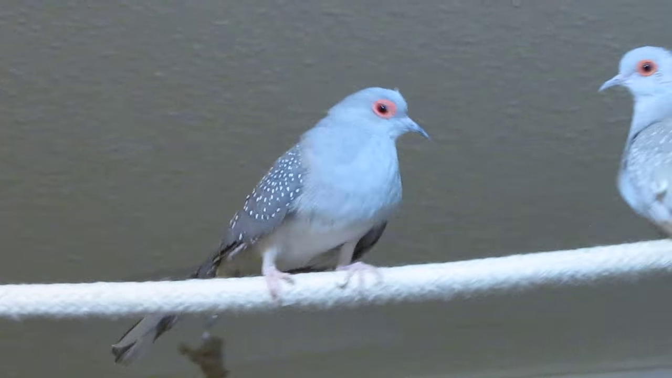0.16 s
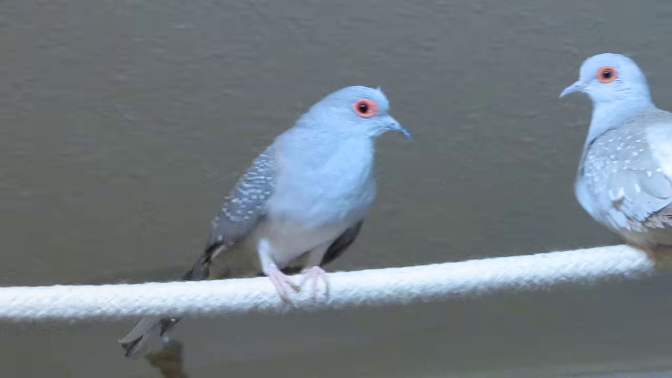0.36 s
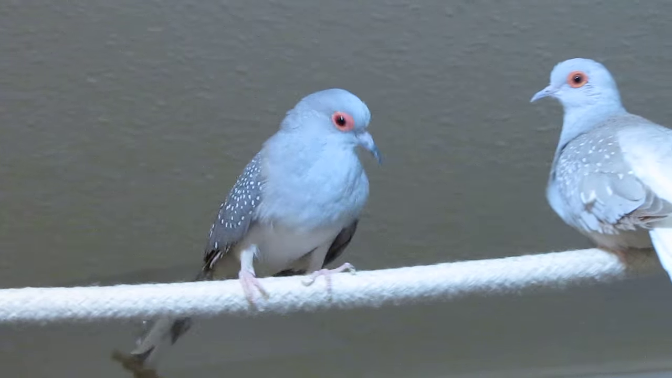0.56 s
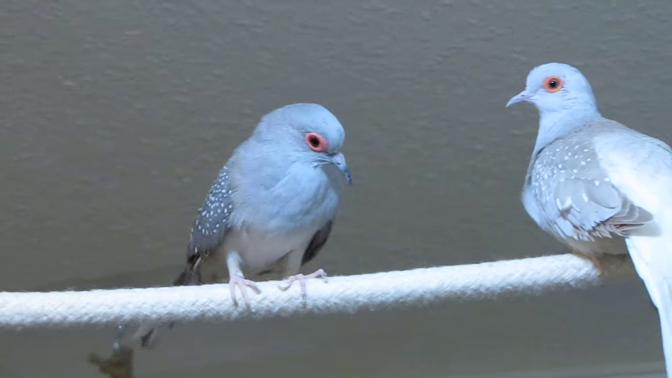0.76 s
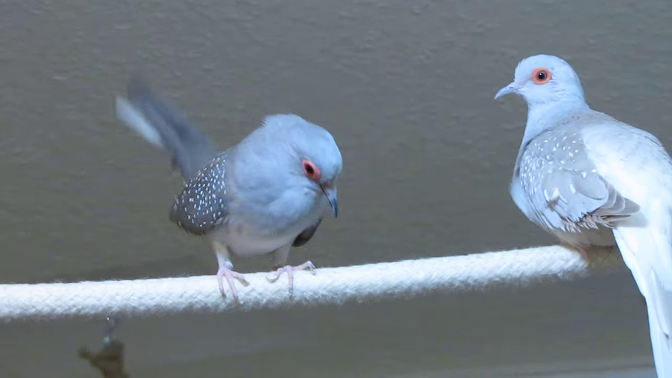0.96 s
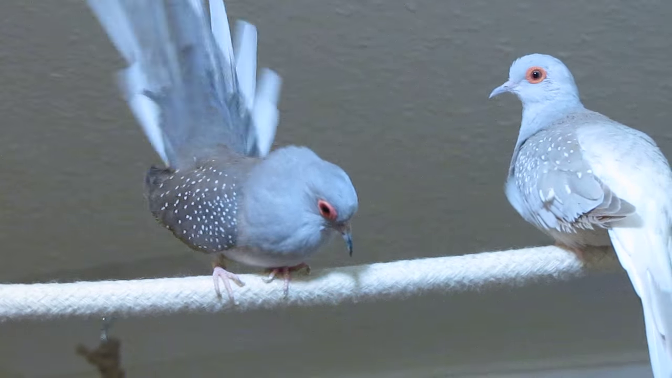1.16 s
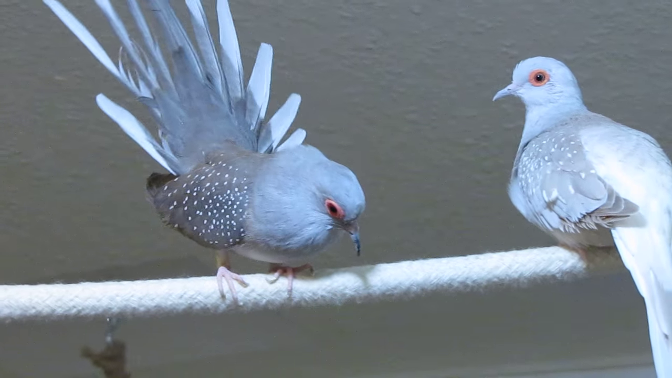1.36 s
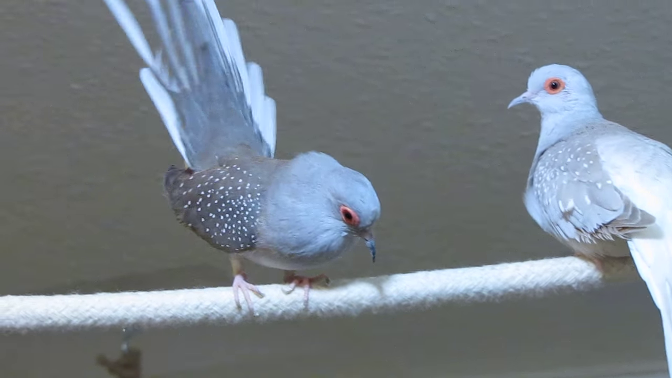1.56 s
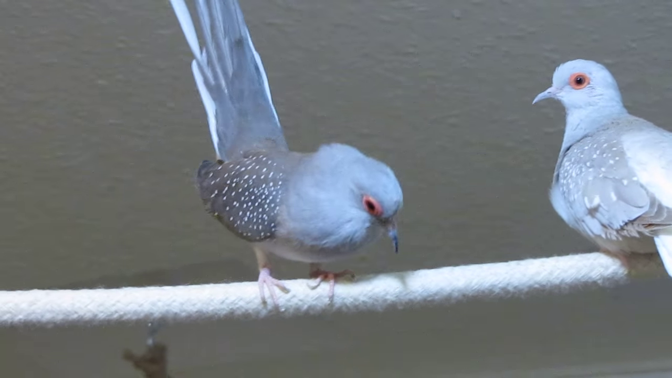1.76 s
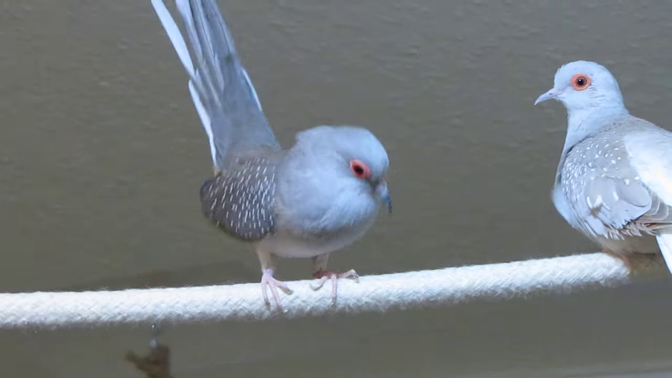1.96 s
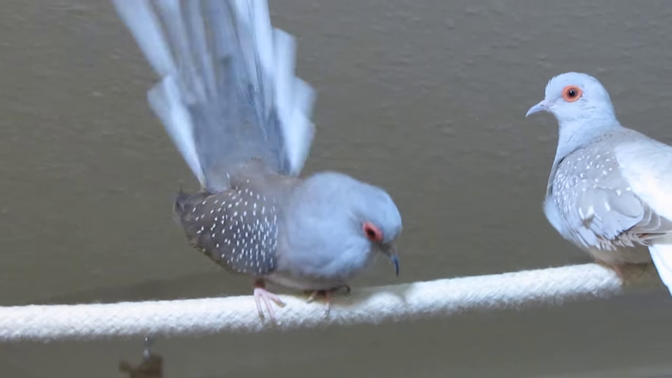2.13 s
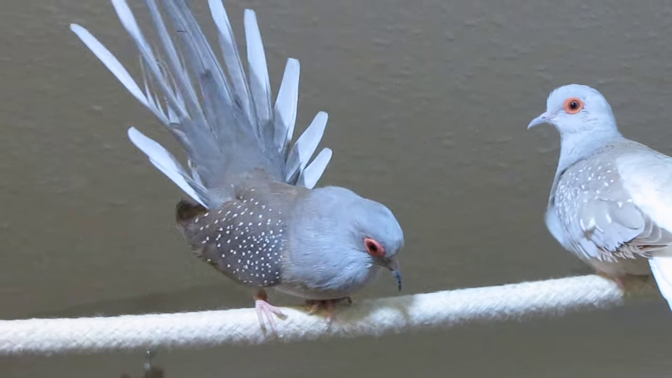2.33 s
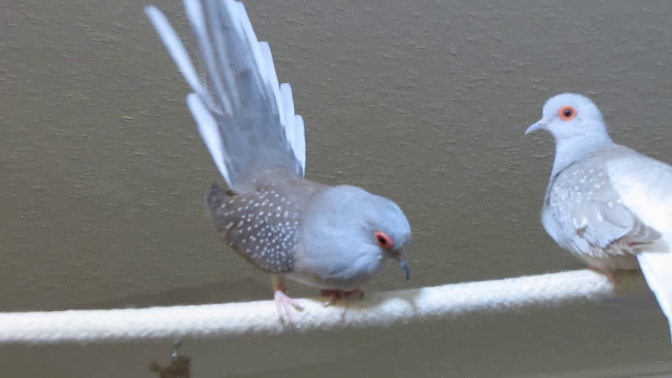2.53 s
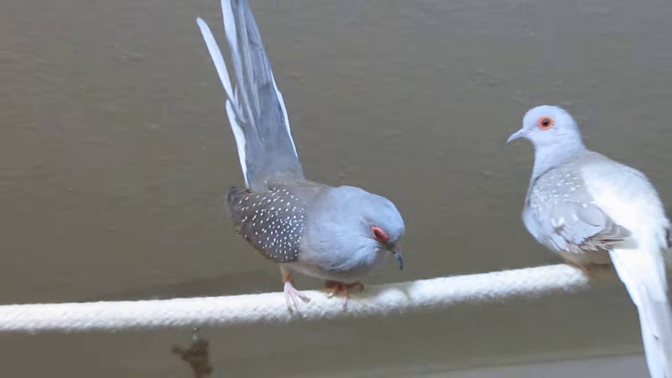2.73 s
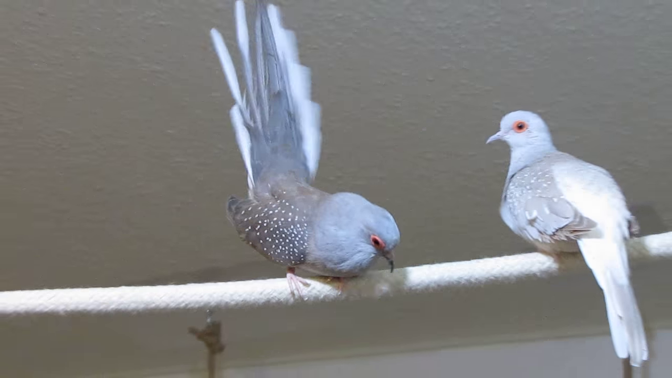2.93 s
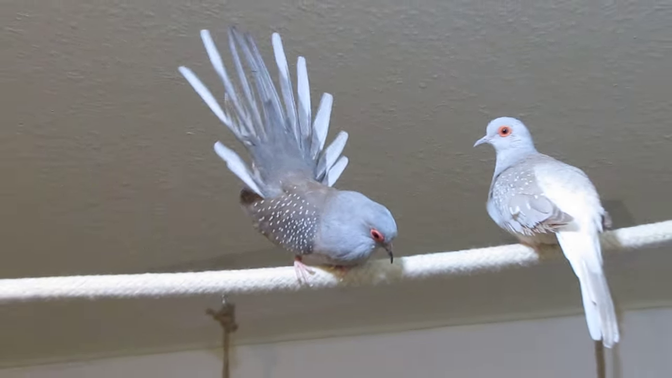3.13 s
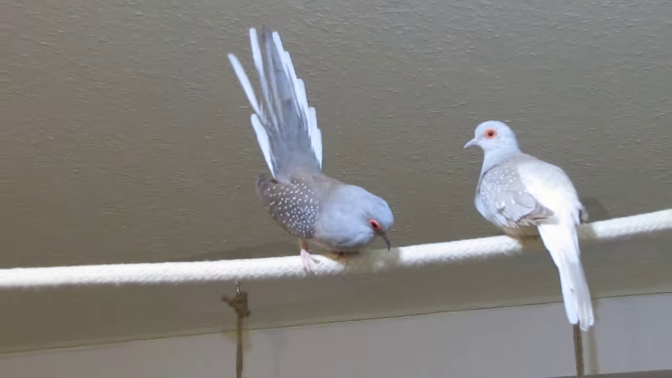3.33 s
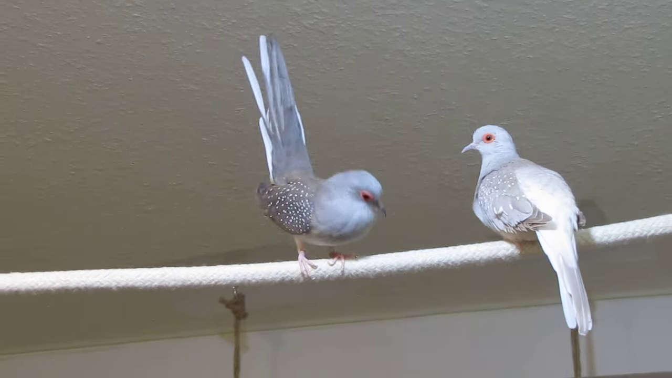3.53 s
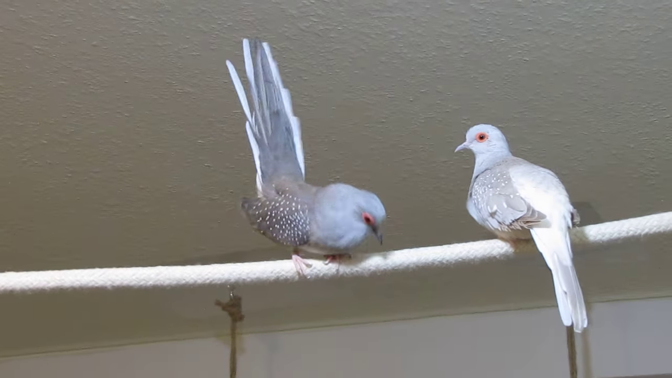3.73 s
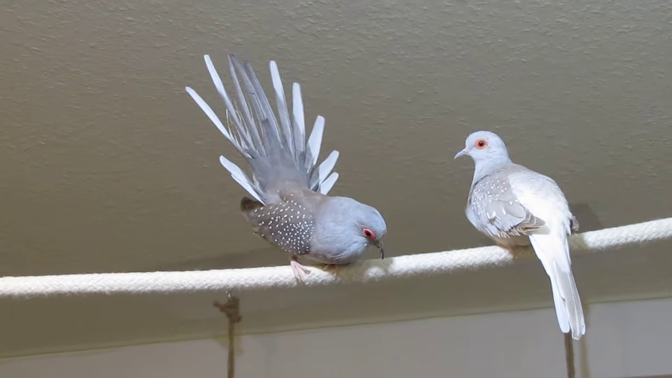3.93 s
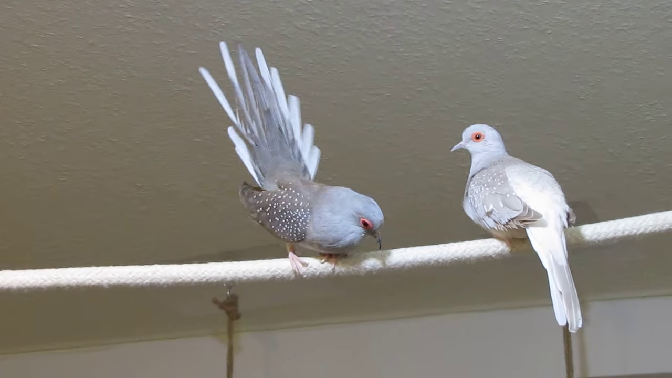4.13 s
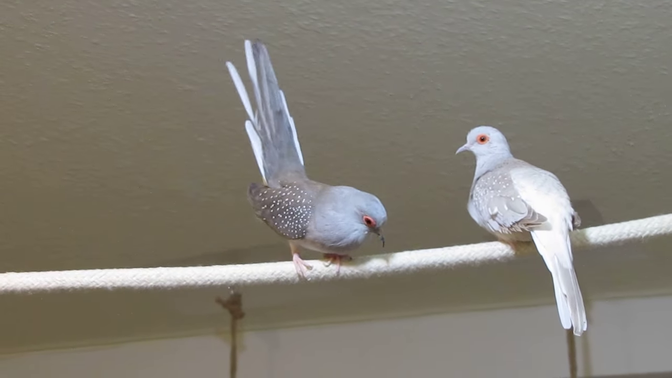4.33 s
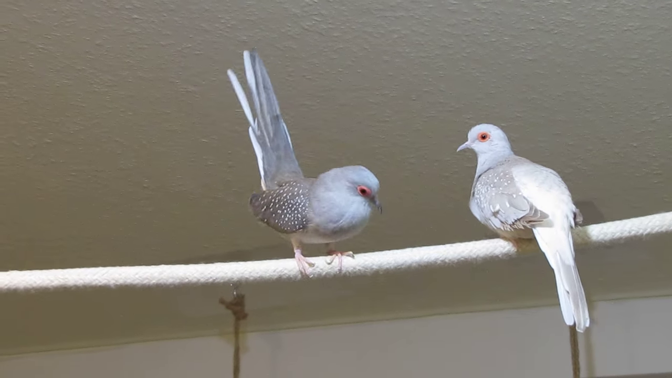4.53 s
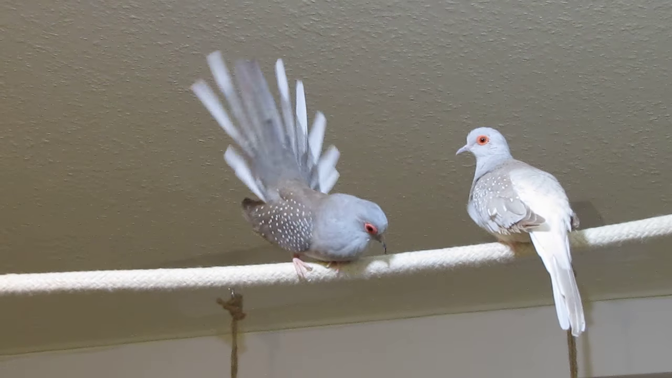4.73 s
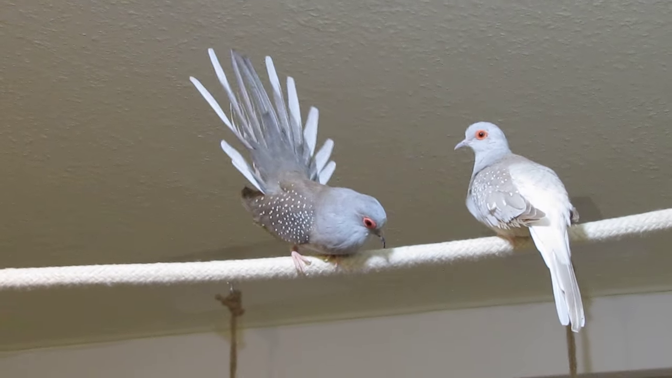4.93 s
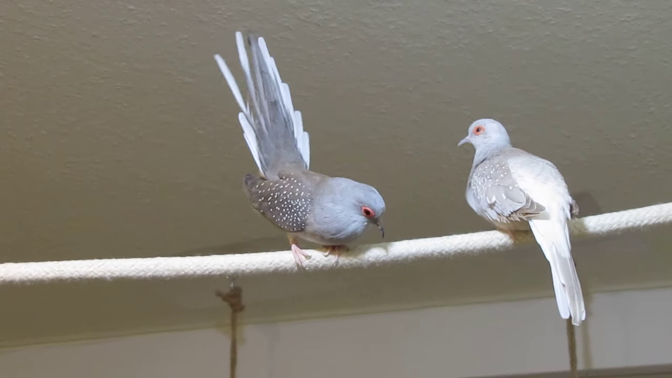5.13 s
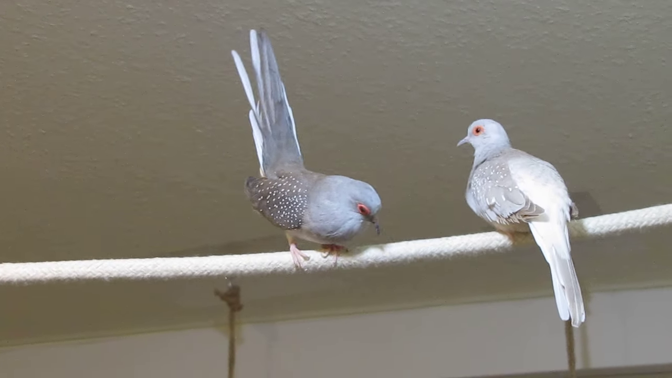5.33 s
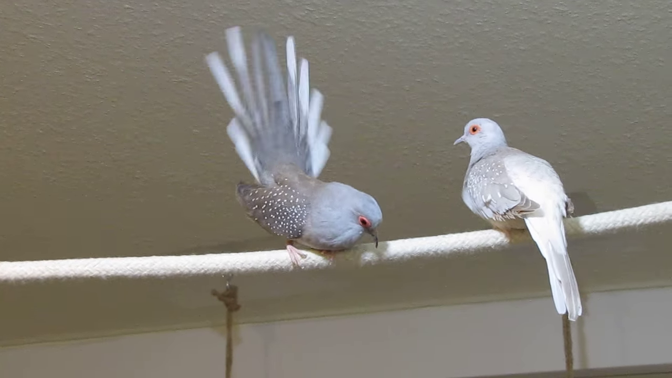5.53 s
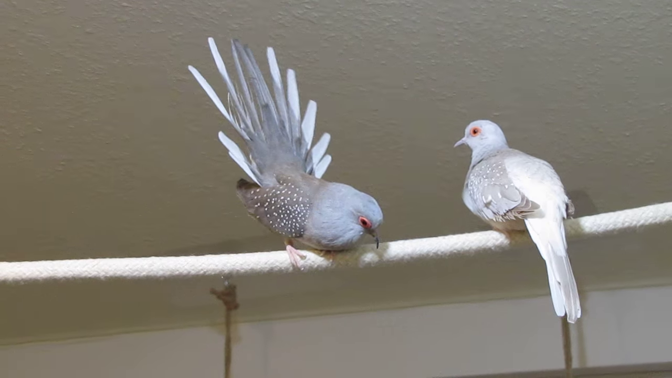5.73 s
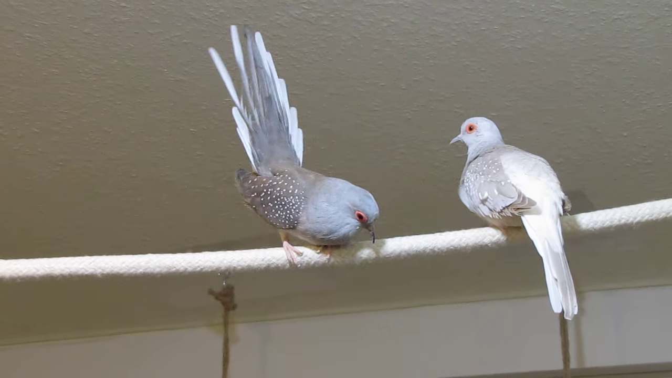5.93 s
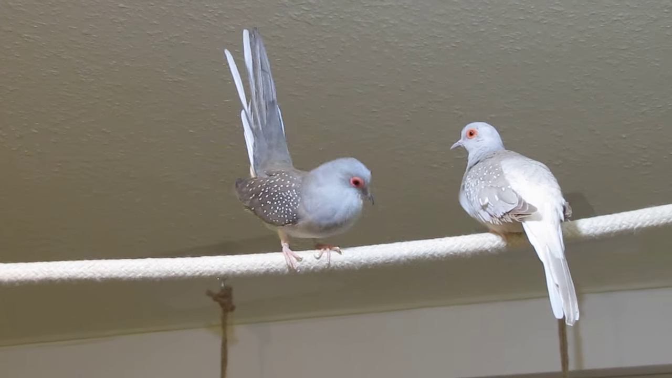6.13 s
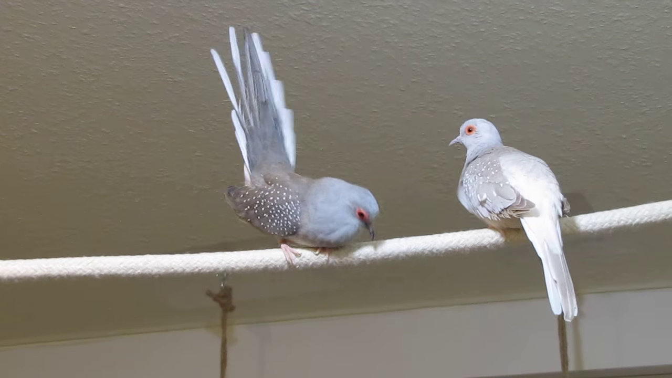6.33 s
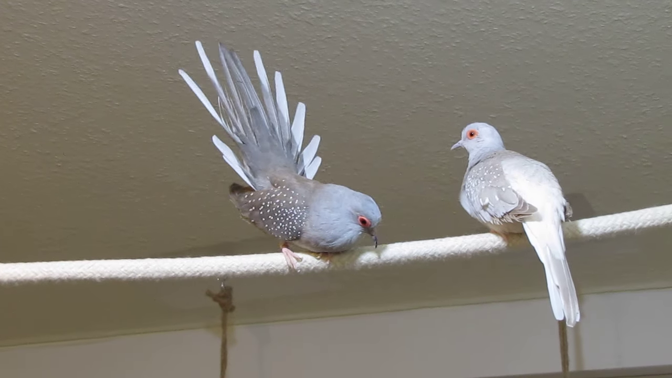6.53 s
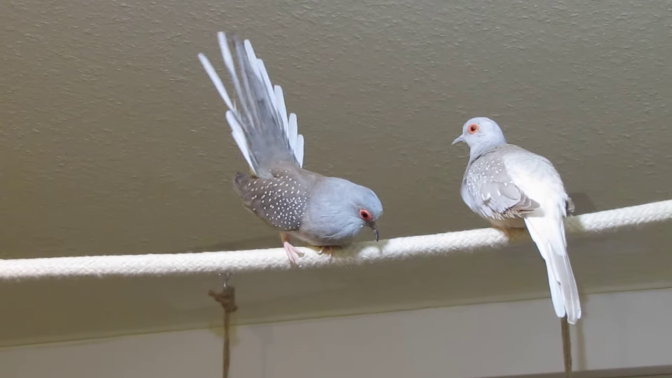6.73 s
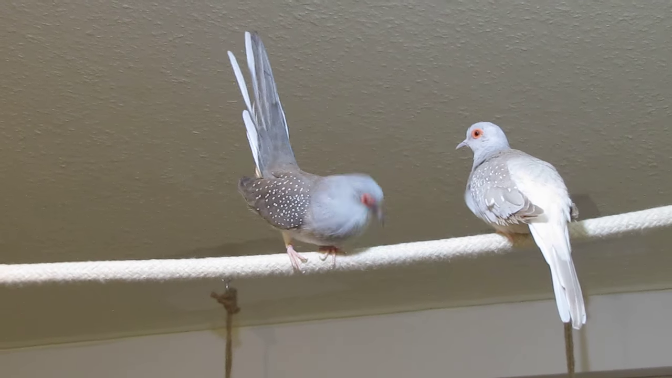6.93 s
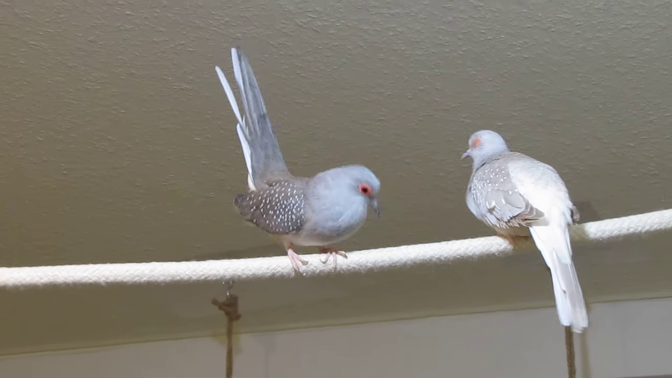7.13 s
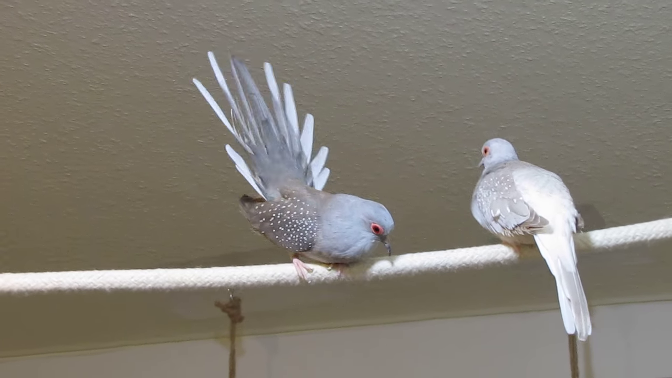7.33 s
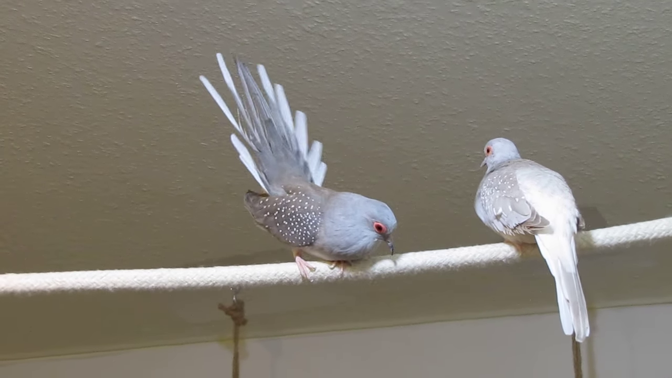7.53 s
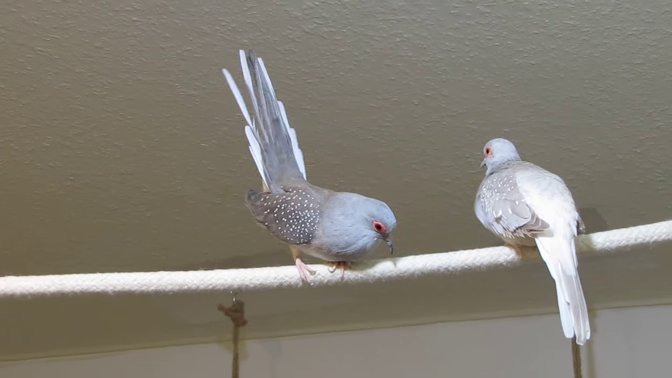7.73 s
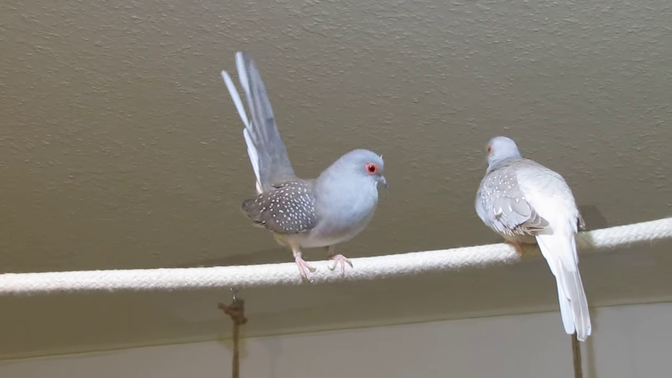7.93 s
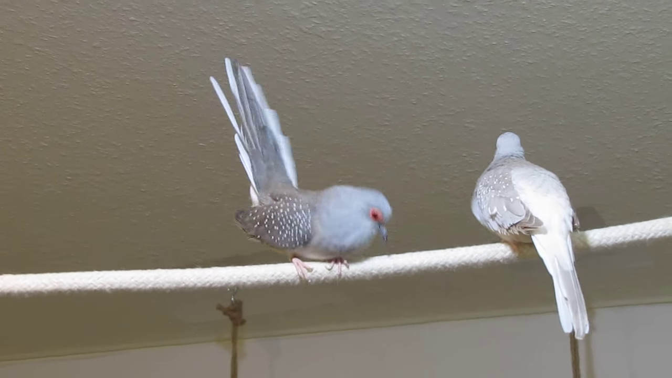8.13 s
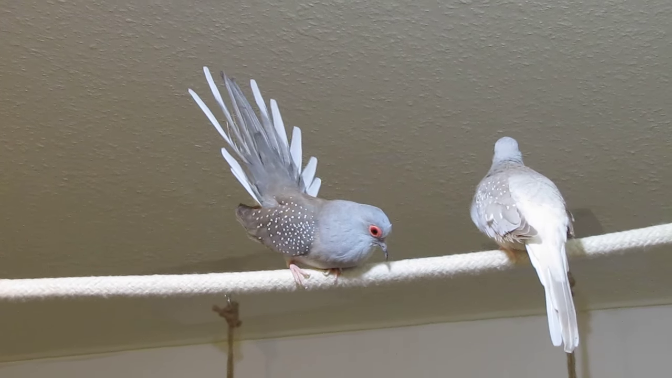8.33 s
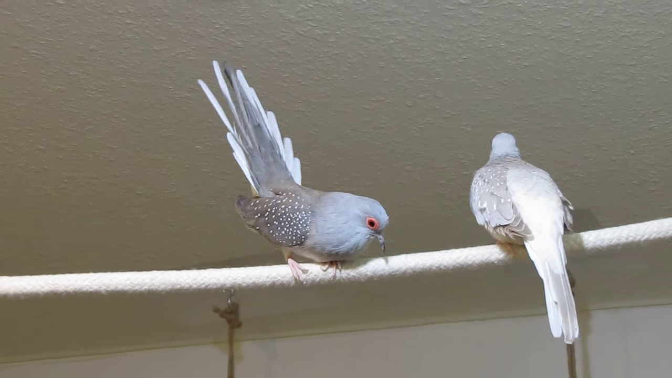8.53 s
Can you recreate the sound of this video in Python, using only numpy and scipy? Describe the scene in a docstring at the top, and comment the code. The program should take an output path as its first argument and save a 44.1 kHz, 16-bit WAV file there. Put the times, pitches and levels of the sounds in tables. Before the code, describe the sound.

A dove gives nine evenly spaced, low hollow coos in an echoing room, with feather swishes, small ticks and distant parrot chatter and squawks.

```python
"""Soft room noise and a low drone that drifts in pitch run throughout; feather swishes come first.
Parrots then chatter, grumble and squawk further off: jittering harmonic tones with rasp, shaped by a throat.
A diamond dove coos nine times in a bare, echoing bird room: a nearly pure gliding tone beats against its
own echo, each coo opens with a swish of the fanned tail, and all but the first have a gruff catch.
Sharp ticks (noise snap plus knock) and soft thuds (swells of dull noise) fall between and under the coos."""
import sys
import numpy as np
from scipy import signal
from scipy.fft import rfft, irfft, next_fast_len
from scipy.io import wavfile
from scipy.ndimage import uniform_filter1d

SR = 44100
rng = np.random.default_rng(int(sys.argv[2]) if len(sys.argv) > 2 else 0)


def log_audio(samples):
    """Write samples as a 16-bit WAV file to the path given in sys.argv[1]."""
    # one column per channel
    frames = np.atleast_2d(samples).T
    # limit to full scale, then quantise
    limited = np.clip(frames, -1, 1)
    pcm = np.round(limited * 32767).astype(np.int16)
    wavfile.write(sys.argv[1], SR, pcm)


N = 382788
TIME = np.arange(N) / SR

# Coos, each a scoop up, a sinking hold and a break to a lower drop: start t/s, scoop/s, hold/s, drop/s,
# knee f/Hz, top f/Hz, drop f/Hz, relative scoop, hold and drop level/dB, scoop and drop roughness [0-1]
COO_SHAPES = [ (1.174, .303, .272, .19, 713.7, 859.5, 768, -20, -15.5, -20.5, .7, 1),
              (2.175, .075, .397, .10, 820, 884.6, 771, -21.5, -15, -17.5, .9, .8),
              (2.996, 0.069, 0.32, .16, 793, 887, 763.5, -22, -15, -16, .9, 0.2),
              (3.838, .17, 0.3, .128, 812.4, 863.3, 788.6, -17, -16, -17.5, 0.8, .5),
              (4.758, 0.15, 0.31, .095, 776, 868, 776.3, -16, -19.5, -20, .65, 0),
              (5.584, 0.13, 0.28, 0.17, 816.5, 863, 795, -18.5, -16.5, -16.5, 0.7, .2),
              (6.43, .18, .295, .11, 786, 860.9, 794.3, -17.5, -16.5, -17, .6, .2),
              (7.333, .155, 0.29, 0.16, 762, 861.2, 785.4, -16.5, -16.5, -18.5, 0.6, 0.1),
              (8.231, 0.17, .24, 0.054, 748.6, 858, 792, -15, -18.5, -24, 0.4, .1), ]


def amp(db):
    """Amplitude ratio of a level in dB."""
    return 10 ** (np.asarray(db) / 20)


def unit(x):
    """Scales x to rms 1."""
    return x / np.sqrt(np.mean(x ** 2) + 1e-20)


def read(points, hz):
    """Interpolates a spectrum linearly over log frequency."""
    f, value = np.transpose(points)
    return np.interp(np.log(hz + 1), np.log(f + 1), value)


def follow(rows, t):
    """Interpolates each column of a curve table at times t."""
    s, *columns = np.transpose(rows)
    return [np.interp(t, np.sort(s), c) for c in columns]


def add(mix, start_s, sound):
    """Adds sound into mix from start_s on."""
    part = mix[max(round(start_s * SR), 0):][:len(sound)]
    part += sound[:len(part)]


def fade(t, edge_s):
    """Sine-squared fade at both ends of times t."""
    to_end_s = np.minimum(t - t[0], t[-1] - t)
    return np.sin(np.pi / 2 * np.clip(to_end_s / edge_s, 0, 1)) ** 2


def wobble(size, hz):
    """Smooth random signal, low-passed near hz."""
    span = SR if size <= SR else N
    f = np.fft.rfftfreq(span, 1 / SR)
    spectrum = rfft(rng.standard_normal(span)) / (1 + (f / hz) ** 4)
    return unit(irfft(spectrum, span)[:size])


def colour(x, spectrum):
    """Filters x by a dB spectrum, zero-padded so that it can ring out."""
    size = next_fast_len(N + SR // 2)
    gain = amp(read(spectrum, np.fft.rfftfreq(size, 1 / SR)))
    return irfft(rfft(x, size) * gain, size)[:N]


def noise(spectrum):
    """Coloured noise of rms 1."""
    return unit(colour(rng.standard_normal(N), spectrum))


def swells(rows):
    """Sum of Gaussian envelopes, one per row: peak t/s, level/dB, standard deviation/s."""
    return sum(amp(db) * np.exp(-((TIME - s) / half_s) ** 2 / 2) for s, db, half_s in rows)


def ports(pair):
    """Diffuse sound at two close microphones: left-right correlation varies with frequency."""
    # Left-right likeness: f/Hz, correlation [-1 to 1]
    alike = [(60, 0.78), (250, 0.14), (800, 0.87), (1500, 0.26), (2700, 0.16), (3600, -0.039),
             (7000, -0.14), (12000, 0.097)]
    a, b = rfft(pair)
    same = np.clip(read(alike, np.fft.rfftfreq(pair.shape[1], 1 / SR)), -1, 1)
    mid = a * np.sqrt((1 + same) / 2)
    side = b * np.sqrt((1 - same) / 2)
    return irfft(np.array([mid + side, mid - side]), pair.shape[1])


def room(x, wet_db, gap_s=.004, lag_s=0):
    """Direct sound, late by lag_s on the right, plus dense reflections decaying at a rate per band."""
    # Reverberation: f/Hz, t60/s
    decay = [(200, 0.072), (800, 0.58), (1500, 0.62), (4000, 0.51), (10000, 0.3), (16000, .25)]
    hz, t, z = signal.stft(ports(rng.standard_normal((2, SR))), SR, nperseg=256)
    t60_s = np.maximum(read(decay, hz), .05)[:, None]
    tail = signal.istft(z * amp(-60 * t / t60_s) * (t > gap_s), SR, nperseg=256)[1]
    # near-unit energy, from the median decay of the lower bands
    tail /= np.sqrt(SR * np.median(t60_s[:60]) / np.log(10 ** 6))
    echo = signal.fftconvolve(x[None], tail, axes=1)[:, :N]
    direct = np.array([x, np.interp(TIME - lag_s, TIME, x)])
    return (direct + amp(wet_db) * echo) / np.sqrt(1 + amp(wet_db) ** 2)


def room_noise(gain_db=6):
    """Diffuse coloured noise with a slowly changing level."""
    # Noise colour: f/Hz, level/dB
    air_colour = [(15, -30), (28, 1.5), (60, -1.5), (110, -6.5), (200, -5.5), (320, -8.5), (550, -14),
                  (900, -6), (1150, -9.5), (1600, -17.5), (2300, -22), (5000, -25.5), (9500, -30.5),
                  (15500, -40.5)]
    # Noise level before gain_db: t/s, level/dB
    air_level = [(0, -56), (1.0, -55.5), (1.9, -55.5), (3.3, -52.5), (3.75, -57), (4.3, -53), (5.0, -58.5),
                 (6.4, -56.5), (8.68, -57.5)]
    air = ports(np.array([noise(air_colour), noise(air_colour)]))
    return air * amp(follow(air_level, TIME)[0] + gain_db)


def low_drone(octave_db=-19, waver_db=1.5):
    """Low tone with a weak octave; pitch and level drift and waver."""
    # Pitch before waver: t/s, f/Hz
    drone_pitch = [(0.0, 72.3), (0.14, 73.2), (0.77, 48.98), (1.04, 67.26), (1.33, 72.82), (1.52, 63.05),
                   (2.1, 60.92), (2.32, 70.64), (3.12, 83.04), (3.58, 57.1), (7.54, 60.43), (7.98, 67.2),
                   (8.68, 69.2)]
    # Level before waver: t/s, level/dB
    drone_level = [(0.0, -66), (0.02, -64), (0.67, -67), (0.97, -49), (1.52, -53), (2.39, -46.5),
                   (2.97, -63.5), (3.26, -48), (3.34, -59), (4.76, -45), (4.88, -61), (5.78, -47),
                   (6.77, -44.5), (6.94, -56), (7.06, -44), (7.76, -54), (8.32, -43.5), (8.68, -52)]
    hz, db = follow(drone_pitch, TIME)[0], follow(drone_level, TIME)[0]
    phase = 2 * np.pi * np.cumsum(hz * (1 + 0.027 * wobble(N, 2.8))) / SR
    tone = unit(np.sin(phase) + amp(octave_db) * np.sin(2 * phase))
    return tone * amp(db + waver_db * wobble(N, 6))


def feathers(fan_lead_s=0.0053, fan_db=-47.5, fan_half_s=0.011, grain_db=1.0, grain_hz=150):
    """Tail feathers slide over each other, fanning open just before each coo: grainy noise swells."""
    # Rustles between the fans: peak t/s, level/dB, standard deviation/s
    rustles = [(0.39, -57, 0.068), (1.608, -49, 0.021), (2.493, -61.5, 0.31), (4.224, -45, 0.058),
               (4.636, -48, 0.041)]
    # Feather noise colour: f/Hz, level/dB
    feather_colour = [(300, -6.5), (1500, -1.5), (4000, -5.5), (8000, -10.5), (12000, -16), (16000, -18.5)]
    fans = [(row[0] - fan_lead_s, fan_db, fan_half_s) for row in COO_SHAPES]
    grain = amp(grain_db * wobble(N, grain_hz))
    return room(swells(fans + rustles) * noise(feather_colour) * grain, wet_db=2.5)


def parrot_voice(t, db, hz, rough, slope_db, jitter=0.14, jitter_hz=450,
                 rasp_db=-4, flutter_db=8.5, flutter_hz=220):
    """Five jittering harmonics weighted by the throat, plus rasp noise, under a random flutter."""
    # Throat resonances: f/Hz, level/dB
    throat = [(500, -42), (1000, -3), (1500, -5), (2100, 1.5), (2700, 8), (3500, -2), (4400, -4),
              (5400, -13), (6300, -13), (7000, -15.5), (7800, -14), (9000, -20.5), (10400, -28),
              (11500, -31), (14000, -44.5), (16000, -44.5)]
    phase = 2 * np.pi * np.cumsum(hz * (1 + jitter * rough * wobble(len(t), jitter_hz))) / SR
    k = np.arange(1, 6)[:, None]
    partials = amp(read(throat, k * hz) + slope_db * np.log2(k))
    tone = (partials * np.sin(k * phase)).sum(0) / np.sqrt((partials ** 2).sum(0) / 2)
    harsh = amp(rasp_db) * rough
    voice = (tone + harsh * noise(throat)[:len(t)]) / np.sqrt(1 + harsh ** 2)
    flutter = unit(amp(flutter_db * rough * wobble(len(t), flutter_hz)))
    return amp(db) * voice * flutter * fade(t, edge_s=0.0068)


def chatter(start_s, length_s, db, fade_db, from_hz, to_hz, rough, slope_db):
    """Hoarse note with linear pitch glide and dB ramp."""
    t = np.arange(0, length_s, 1 / SR)
    level_db = db + fade_db * t / length_s
    hz = from_hz + (to_hz - from_hz) * t / length_s
    return start_s, parrot_voice(t, level_db, hz, rough, slope_db)


def squawk(start_s, opening_s, flick_s, low_s, high_s, opening_db, flick_db, low_db, high_db,
           low_hz, high_hz, harsh, slope_db):
    """Four vocal registers in turn, each gliding a little, with quick jumps between."""
    opening_hz, flick_hz, jump_s, release_s = 2010, 3490, 0.0055, .02
    flick_rough, shrill_rough = .42, 0.099
    opening_rise, shrill_sag = .2, .025  # shares of the pitch
    opening_swell_db = 4
    ends = np.cumsum([opening_s, flick_s, low_s, high_s])
    t = np.arange(0, ends[-1], 1 / SR)
    registers = np.array([
        (opening_db, opening_hz, harsh, opening_rise),
        (flick_db, flick_hz, flick_rough, -shrill_sag),
        (low_db, low_hz, shrill_rough, -shrill_sag),
        (high_db, high_hz, shrill_rough, -shrill_sag),
    ])
    db, hz, rough, glide = registers[np.searchsorted(ends, t)].T
    progress = np.interp(t, np.r_[0, ends], np.arange(len(ends) + 1)) % 1  # 0-1 in each register
    db = db + opening_swell_db * (progress - .5) * (t < opening_s)
    hz = hz * (1 + glide * (progress - .5))
    controls = uniform_filter1d(np.array([db, hz, rough]), max(int(jump_s * SR), 1))
    release = np.sqrt(np.minimum((ends[-1] - t) / release_s, 1))
    return start_s, release * parrot_voice(t, *controls, slope_db)


def parrots(gain_db=6, grumble_slope_db=-16.5):
    """Chatter, squawks and one long arching grumble, further off in the room."""
    # Lower chatter: start t/s, length/s, relative level/dB, level change/dB, start f/Hz, end f/Hz,
    # roughness [1], overtone slope [dB/octave]
    chatter_notes = [ (1.158, 0.084, -44, -7.5, 1347, 1442, 0.4, -24),
                     (4.413, 0.0632, -33.5, -4.5, 1726, 1576, 0.31, -6),
                     (4.523, .14, -36.5, -13.5, 1430, 1883, 0.8, -29),
                     (4.684, 0.038, -29, -11, 1563, 1744, 1.1, -37),
                     (4.835, .045, -29, 2, 1714, 1371, 0.6, -9.5),
                     (5.26, 0.24, -35, -1.5, 1569, 1447, .7, -11.5),
                     (5.618, 0.36, -46.5, -11, 1883, 1749, .2, -22), ]
    # Squawks: start t/s, opening/s, flick/s, low/s, high/s, relative opening, flick, low and high level/dB,
    # low f/Hz, high f/Hz, opening roughness [0-1], overtone slope [dB/octave]
    squawk_shapes = [ (4.806, 0.026, 0.028, 0.026, .062, -28.5, -28.5, -18.5, -20, 2654, 3395, 0.42, -1.5),
                     (5.098, 0.051, .023, .028, 0.03, -31, -21.5, -16, -20, 2642, 3250, .95, -8),
                     (6.963, 0.031, 0.018, 0.038, 0.022, -41.5, -32, -22.5, -21, 2667, 3200, 0.4, -7),
                     (8.417, .026, 0.024, 0.026, 0.067, -33, -23.5, -19.5, -21, 2535, 3453, 0.51, -0.5), ]
    # Grumble: t/s, relative level/dB, f/Hz, roughness [0-1]
    grumble = [(5.12, -40.5, 1140, 0.9), (5.209, -34.5, 1337, 0.57), (5.265, -24, 1620, 0.3),
               (5.322, -28, 2086, 0.2), (5.40, -27.5, 2290, 0.44), (5.45, -40, 1928, 0.77),
               (5.55, -36.5, 1566, 0.56), (5.60, -36, 1607, .5)]
    out = np.zeros(N)
    for row in squawk_shapes:
        add(out, *squawk(*row))
    for row in chatter_notes:
        add(out, *chatter(*row))
    t = np.arange(grumble[0][0], grumble[-1][0], 1 / SR)
    add(out, t[0], parrot_voice(t, *follow(grumble, t), grumble_slope_db))
    return amp(gain_db) * room(out, wet_db=2, lag_s=0.0001)


def coo(start_s, scoop_s, hold_s, drop_s, knee_hz, top_hz, drop_hz,
        scoop_db, hold_db, drop_db, scoop_rough, drop_rough):
    """Pitch and roughness of one coo, and its loudness through the scene, echo included."""
    # Standing waves lift or swallow the coo as its pitch moves: f/Hz, level/dB
    standing = [(720, 2), (790, -0.5), (822, 0), (835, -2), (842, -0.5), (851, 4.5), (861, -3.5), (872, 0),
                (886, -21.5)]
    start_hz, snap_s = 668, .04  # snaps from here up to the knee
    rest_hz, sink_s = 830.5, .17  # the hold sinks towards this pitch
    break_s, hold_rough, settle_s = .042, .045, .16
    onset_db, attack_s, attack_share = -17.5, 0.032, 0.24  # a slow scoop also swells slowly
    release_s, echo_db_per_s = 0.024, 108
    t, since = np.arange(0, scoop_s + hold_s + drop_s, 1 / SR), TIME - start_s
    after_hold = t - scoop_s - hold_s

    rising = np.interp(t, [0, snap_s, scoop_s], [start_hz, knee_hz, top_hz])
    sinking = rest_hz + (top_hz - rest_hz) * np.exp((scoop_s - t) / sink_s)
    held = np.where(t < scoop_s, rising, sinking)
    broken = np.clip(after_hold / break_s, 0, 1)
    hz = held + broken * (drop_hz - held)

    settled = np.minimum(t / scoop_s, 1) ** 2
    broken_rough = broken * drop_rough * np.exp(-np.maximum(after_hold, 0) / settle_s)
    rough = hold_rough + (1 - settled) * scoop_rough + broken_rough

    db = scoop_db + settled * (hold_db - scoop_db) + broken * (drop_db - hold_db) + read(standing, hz)
    db = db + onset_db * np.maximum(1 - t / max(attack_s, attack_share * scoop_s), 0)
    dying_db = echo_db_per_s * np.maximum(since - t[-1] + release_s, 0)
    return t, hz, rough, amp(np.interp(since, t, db) - dying_db) * (since > 0)


def dove(waver=0.062, waver_hz=75, purr_hz=65.8, purr_depth=0.45, overtone_fade_db_per_s=14,
         husk_db=-52.0, overtones_db=-9, balance_db=1.26):
    """Syrinx tone scoops, sinks and breaks; the swollen crop passes little but the fundamental."""
    # Closed-beak overtones, before overtones_db: multiple [1], level/dB
    overtones = [(2, -44), (3, -47.5), (4, -49), (5, -53.5)]
    # Husky edge: f/Hz, level/dB
    husk = [(500, -23), (1000, 6), (1450, -1), (2000, -22.5), (2600, -6), (3700, 0), (5000, -24),
            (9000, -39)]
    # Narrow-band ring of the inflated crop: f/Hz, level/dB
    crop = [(300, -37.5), (560, -16.5), (680, -1), (760, 2), (880, 3), (960, -1.5), (1200, -18),
            (2000, -42)]
    tone, edge, rasp, loudness = np.zeros((4, N))
    for start_s, *shape in COO_SHAPES:
        t, hz, rough, level = coo(start_s, *shape)
        phase = 2 * np.pi * np.cumsum(hz * (1 + waver * rough * wobble(len(t), waver_hz))) / SR
        purr = 1 + purr_depth * rough * np.sin(2 * np.pi * purr_hz * t)
        voiced = fade(t, edge_s=0.049) * purr
        partials = sum(amp(db) * np.sin(round(k) * phase) for k, db in overtones)
        add(tone, start_s, voiced * np.sin(phase))
        add(edge, start_s, voiced * amp(-overtone_fade_db_per_s * t) * partials)
        add(rasp, start_s, voiced * rough)
        loudness = np.maximum(loudness, level)
    heard = room(colour(tone, crop), wet_db=-1.5)
    # quick beats against the echo stay; the slow swell follows each coo's loudness
    power = uniform_filter1d(uniform_filter1d(heard.mean(0) ** 2, size=2600), size=1800)
    fundamental = loudness * heard / np.sqrt(abs(power) + 1e-5)
    # overtones and husk lie off the fundamental's standing waves, so they stay even
    upper = room(amp(overtones_db) * edge + amp(husk_db) * rasp * noise(husk), wet_db=9.5)
    return (fundamental + upper) * amp(np.array([[-balance_db], [balance_db]]) / 2)


def ticks(knock_low_hz=330, knock_high_hz=1500):
    """Bright octave-band noise snap over a duller knock, both dying in milliseconds."""
    # Ticks: t/s, snap level/dB, snap centre f/Hz, knock level re snap/dB, t60/s
    tick_hits = [(1.554, -50, 8000, 19.5, 0.015), (1.937, -54.5, 2500, 28.5, 0.018),
                 (2.297, -37.5, 3560, 11, 0.018), (2.326, -44.5, 4000, -26.5, .02),
                 (2.375, -34, 4600, 9, 0.014), (3.159, -50.5, 3500, -8, .03),
                 (3.329, -29, 3760, -18, 0.0094), (3.481, -32, 3360, 11.5, 0.03)]
    out, t = np.zeros(N), np.arange(SR // 10) / SR
    for s, db, hz, knock_db, t60_s in tick_hits:
        a, b = rng.standard_normal((2, len(t)))
        snap_band = [hz / np.sqrt(2), hz * np.sqrt(2)]
        snap = signal.lfilter(*signal.butter(1, snap_band, "band", fs=SR), a)
        knock = signal.lfilter(*signal.butter(2, [knock_low_hz, knock_high_hz], "band", fs=SR), b)
        add(out, s, amp(db - 60 * t / t60_s) * (unit(snap) + amp(knock_db) * unit(knock)))
    return room(out, wet_db=-15)


def catches(catch_db=-35, after_s=0.026, half_s=0.028):
    """Gruff noise swell of the throat as each coo but the first takes hold."""
    # Colour of the throat catch: f/Hz, level/dB
    catch_colour = [(300, -35.5), (520, -16), (660, 7.5), (800, 3.5), (1000, -3), (1250, -21),
                    (2500, -42.5)]
    rows = [(row[0] + after_s, catch_db, half_s) for row in COO_SHAPES[1:]]
    return room(swells(rows) * noise(catch_colour), wet_db=0.0)


def bumps():
    """Soft thuds in the room: short swells of dull noise."""
    # Thuds: peak t/s, level/dB, standard deviation/s
    thuds = [(2.38, -42, 0.029), (3.48, -48.5, 0.042), (4.23, -42.5, 0.05)]
    # Dull thud colour: f/Hz, level/dB
    thud_colour = [(20, -15.5), (60, -1), (95, -6.5), (160, -14), (350, -18.5), (900, -23.5), (3000, -57.5)]
    return room(swells(thuds) * noise(thud_colour), wet_db=-6.0)


def scene():
    """Sums all layers in stereo."""
    background = room_noise() + low_drone()
    birds = feathers() + parrots() + dove() + catches()
    return background + birds + ticks() + bumps()


def record(dry):
    """The recorder's band limit: a linear-phase low-pass."""
    edge_hz = 15750
    lowpass = signal.firwin(511, edge_hz, window=("kaiser", 9), fs=SR)
    return signal.oaconvolve(dry, lowpass[None], "same")


dry = scene()
out = record(dry)
log_audio(out)
```